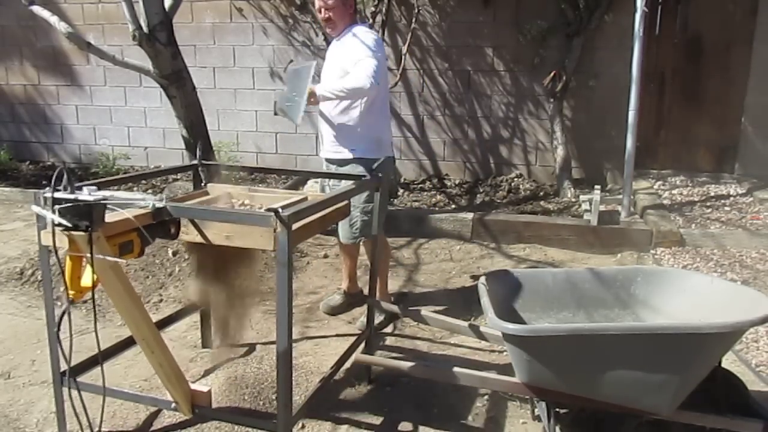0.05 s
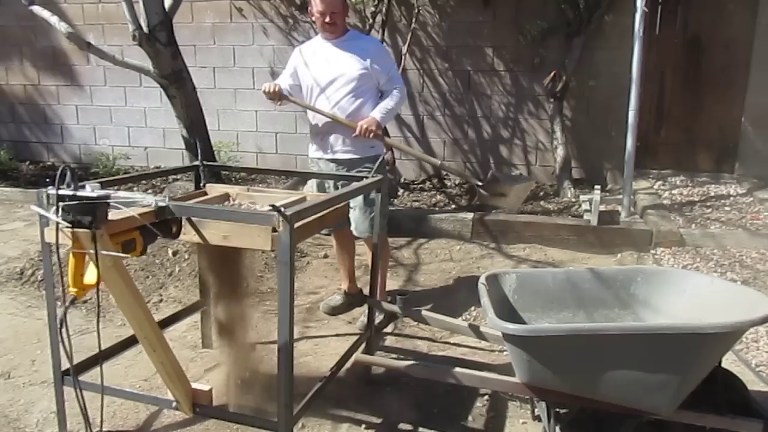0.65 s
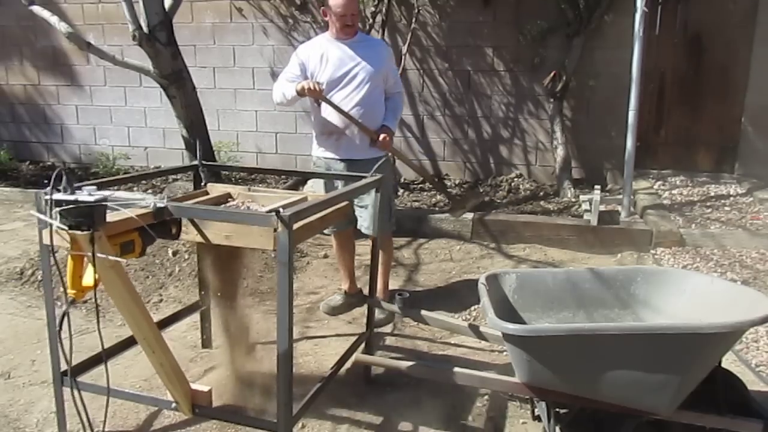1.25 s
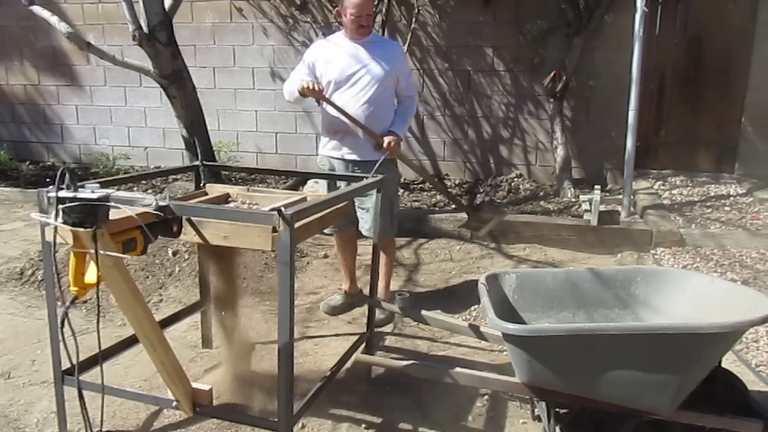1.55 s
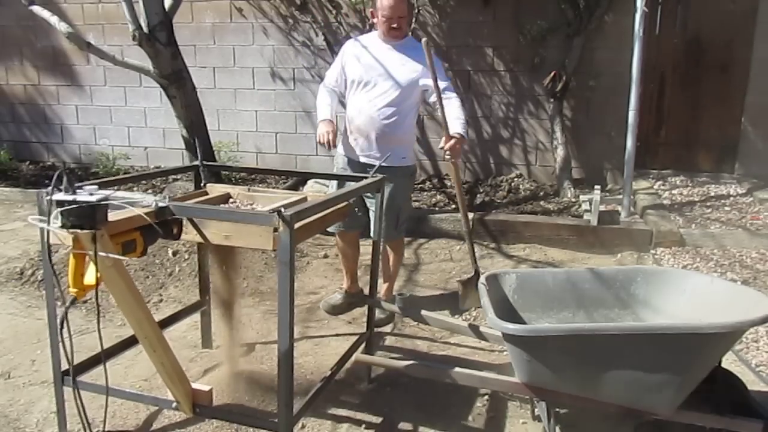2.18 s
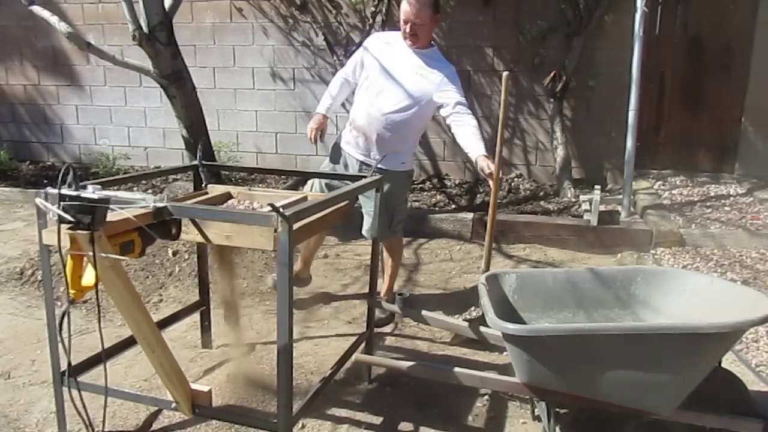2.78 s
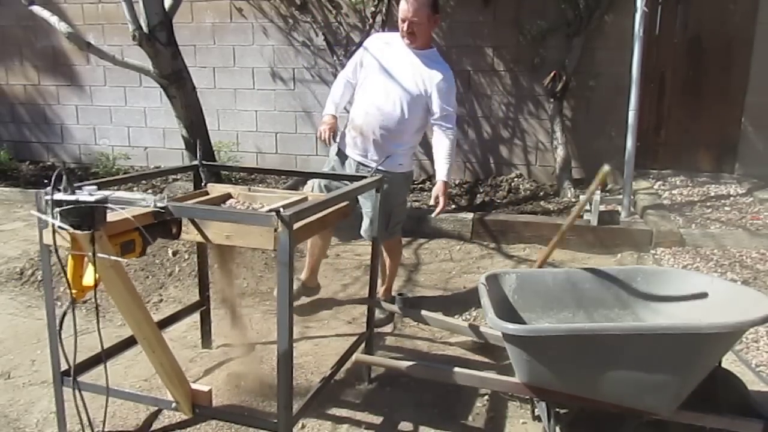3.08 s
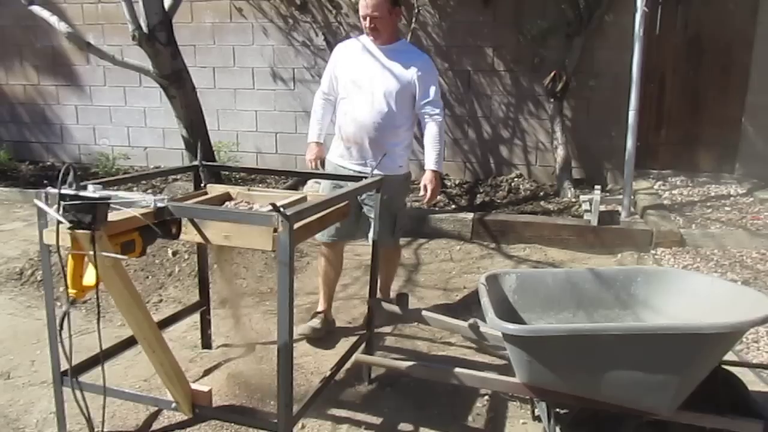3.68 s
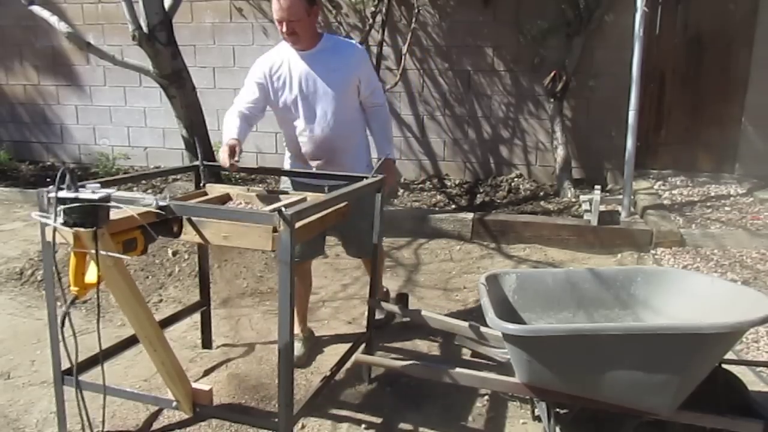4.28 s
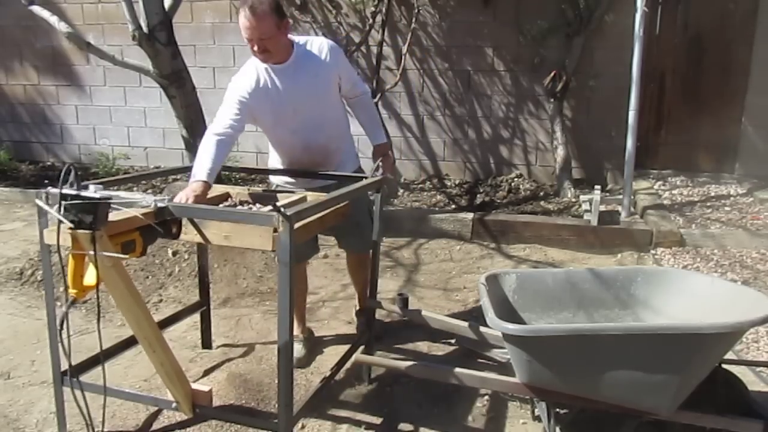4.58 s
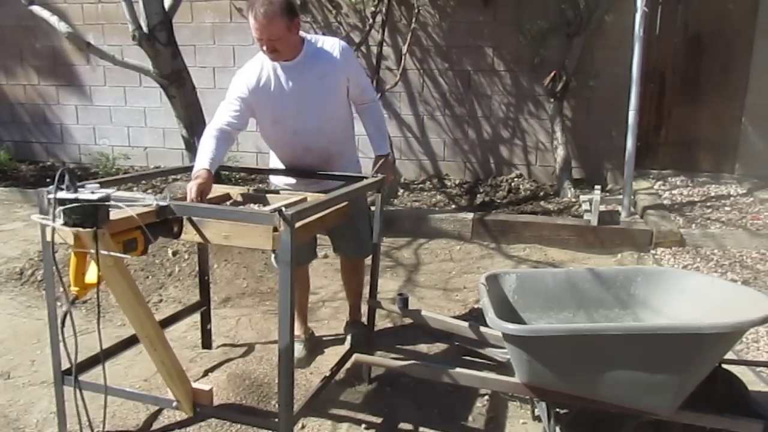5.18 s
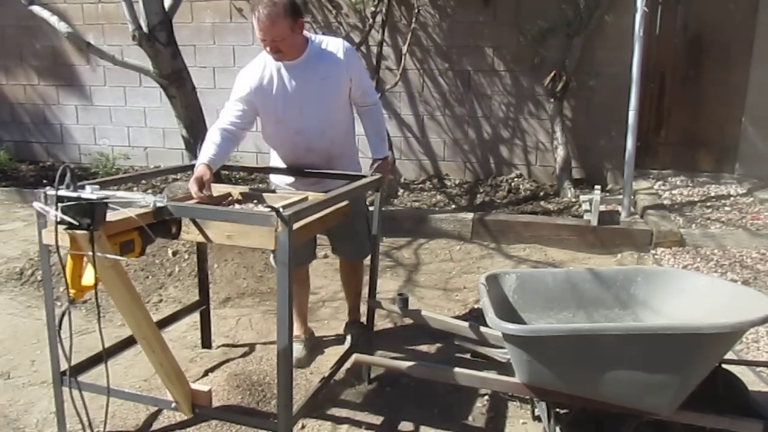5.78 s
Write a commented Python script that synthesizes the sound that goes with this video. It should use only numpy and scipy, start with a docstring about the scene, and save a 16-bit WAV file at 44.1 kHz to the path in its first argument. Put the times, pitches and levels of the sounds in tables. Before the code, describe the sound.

A reciprocating saw shakes a wooden sieve in a steel frame with a fast, even rattle. The tray knocks, its runners squeak, stones tumble and clink, and soil hisses through wire mesh. Near the middle, a shovel stabs gritty ground, then topples onto a plastic wheelbarrow with a loud crack and hollow boom. The rattling dips in volume and creeps back. It is heard in a backyard with little echo.

```python
"""Saw-driven soil sieve in a backyard.

A reciprocating saw shakes a wooden tray in a steel frame, about 7.6 strokes a second. Each stroke
knocks the tray, makes the runners chatter and throws stones and soil across the wire mesh.
A shovel stabs the ground, then topples onto a plastic wheelbarrow; the automatic gain ducks
and creeps back. A wall and a fence scatter a little sound."""
import sys
import numpy as np
from scipy import signal
from scipy.fft import rfft, irfft, next_fast_len
from scipy.io import wavfile
from scipy.ndimage import uniform_filter1d

SR = 44100
rng = np.random.default_rng(int(sys.argv[2]) if len(sys.argv) > 2 else 0)


def unload_audio(sound):
    """Save the sound as a 16-bit wav file, at the path given as the first command line argument."""
    columns = np.transpose(np.atleast_2d(sound))
    # keep every value between -1 and 1, then stretch to whole-number steps
    steps = np.round(np.clip(columns, -1, 1) * 32767)
    wavfile.write(sys.argv[1], SR, steps.astype(np.int16))


N = 257984
TIME = np.arange(N) / SR


def undb(db):
    """Decibels to gain."""
    return 10 ** (np.asarray(db) / 20)


def level(x, db):
    """Scale to an rms level."""
    return x * undb(db) / np.sqrt(np.mean(x ** 2))


def butter(x, order, hz, kind="low"):
    """Causal Butterworth filter."""
    return signal.sosfilt(signal.butter(order, hz, kind, fs=SR, output="sos"), x)


def colour(x, spectrum):
    """Filter by (frequency [Hz], gain [dB]) points."""
    hz, db = np.transpose(spectrum)
    size = next_fast_len(N + 4096)
    bins_hz = np.maximum(np.fft.rfftfreq(size, 1 / SR), 1)
    gain = undb(np.interp(np.log(bins_hz), np.log(hz), db))
    return irfft(rfft(x, size) * gain, size)[:N]


def impulses(times_s, sizes):
    """Impulse train of given times and sizes."""
    at = np.round(np.ravel(times_s) * SR).astype(int)
    inside = (at >= 0) & (at < N)
    return np.bincount(at[inside], np.ravel(sizes)[inside], N)


def decay(x, tau_s):
    """Give each impulse an exponential tail."""
    return signal.lfilter([1], [1, -np.exp(-1 / (tau_s * SR))], x)


def grains(rate_hz, spread_db):
    """Random collisions of unit rms; spread_db scales their size scatter."""
    size = undb(spread_db * np.minimum(rng.exponential(size=N), 3))
    return level((rng.random(N) < rate_hz / SR) * size * rng.choice([-1, 1], N), db=0)


def ring(x, modes):
    """Drive damped modes of alternating sign; little radiates below the lowest."""
    t = TIME[:SR // 2]
    body = sum((-1) ** k * undb(db) * np.sin(2 * np.pi * hz * t) * np.exp(-np.log(1000) * t / t60_s)
               for k, (hz, db, t60_s) in enumerate(modes))
    return signal.fftconvolve(x, butter(body, 2, 0.5 * modes[0][0], "high"))[:N]


def diffuse(x, t60_s):
    """Convolve with a decaying noise tail of unit energy."""
    t = TIME[:SR // 2]
    tail = rng.standard_normal(len(t)) * np.exp(-np.log(1000) * t / t60_s)
    return signal.fftconvolve(x, tail / np.sqrt(np.sum(tail ** 2)))[:N]


def latest(starts_s):
    """Per sample, index of the latest start; 0 before the first."""
    return np.maximum(np.searchsorted(starts_s, TIME) - 1, 0)


# Side reflections: (frequency [Hz], gain [dB])
SIDE_SPECTRUM = [(60, -19), (130, -8), (350, -16), (1400, -26), (2800, -15.5), (5500, -37), (13000, -5)]

def yard(x):
    """Block wall and fence scatter sound from ahead and from the sides; stereo."""
    delayed = np.pad(x, (SR // 80, 0))
    mid = x + undb(-16) * diffuse(delayed, t60_s=0.29)
    side = colour(diffuse(delayed, t60_s=0.12), SIDE_SPECTRUM)
    return np.array([mid + side, mid - side])


def soil_fall(peak_s=1.0, spread_s=0.35, band_hz=(52, 80)):
    """The bulk of the soil drops through the mesh and thuds softly on the ground."""
    thuds = butter(grains(rate_hz=300, spread_db=2), 2, band_hz, "band")
    return level(thuds, db=-53) * np.exp(-0.5 * ((TIME - peak_s) / spread_s) ** 2)


# Drumming of the loaded tray: (frequency [Hz], gain [dB])
RUMBLE_SPECTRUM = [(40, -20), (75, -4), (90, -4.5), (130, -2), (160, 0), (260, -1), (400, 4.5), (900, -37)]

def tray_rumble(shake_db):
    """The loaded tray drums low, louder as the frame shakes harder."""
    drumming = colour(grains(rate_hz=1500, spread_db=2.5), RUMBLE_SPECTRUM)
    return level(drumming * undb(1.8 * shake_db), db=-43)


# Drive jolts per stroke: (delay [s], frequency [Hz], level [dB], t60 [s])
CRANK_JOLTS = [(0.013, 105, -41, 0.14), (0.037, 363, -24, 0.022), (.057, 455, -24, 0.059),
               (0.061, 123.4, -37.5, 0.14), (.03, 75.5, -47, 0.22), (0.106, 260, -33.5, 0.1)]

def saw(strokes_s, shake_db, jitter_s=0.00071, uneven_db=2.5):
    """The crank jolts the frame at set points of each stroke; the frame sways at 4x the stroke rate."""
    jolts = 0
    for delay_s, hz, db, t60_s in CRANK_JOLTS:
        timing, force = rng.standard_normal((len(strokes_s), 2)).T
        blows = impulses(strokes_s + delay_s + jitter_s * timing, undb(uneven_db * force))
        jolts = jolts + ring(blows, [(hz, db, t60_s)])
    turns = np.interp(TIME, strokes_s, np.arange(len(strokes_s)))
    sway = np.sin(2 * np.pi * 4 * turns)
    return (jolts + level(sway, db=-63.5)) * undb(shake_db)


# Grit on wire mesh: (frequency [Hz], gain [dB])
SOIL_SPECTRUM = [(1500, -27), (4100, -6.5), (4900, -1), (6100, 0), (9000, -7), (11500, -19), (13500, -23),
                 (15500, -48)]

def soil_hiss(activity_db):
    """Grit slides over and rains through the whole mesh: a wide stereo hiss."""
    grit = (grains(rate_hz=8000, spread_db=2) * undb(activity_db) for _ in range(2))
    mid, side = (level(colour(x, SOIL_SPECTRUM), db=-34.5) for x in grit)
    side = colour(side, [(4000, -13.5), (9000, -8), (13000, -5)])
    return np.array([mid + side, mid - side])


# Blade in grit: (frequency [Hz], gain [dB])
BLADE_SPECTRUM = [(2000, -9), (4000, -5), (4900, -2), (7400, 1.5), (10000, -8.5), (13900, -23),
                  (15500, -39)]

def shovel_stab(start_s=2.468, rise_s=0.0038, length_s=0.026, fade_s=0.014):
    """The steel blade shears into gritty ground."""
    age_s = TIME - start_s
    push = np.clip(age_s / rise_s, 0, 1) * np.exp(-np.maximum(age_s - length_s, 0) / fade_s)
    return push * level(colour(grains(rate_hz=2600, spread_db=2), BLADE_SPECTRUM), db=-24)


# Handle landing and bouncing: (time [s], tub level [dB], rim level [dB])
HANDLE_HITS = [(3.154, -16, -6), (3.1565, -18, -13), (3.1590, -0.5, -5), (3.3446, -9, -34),
               (3.3513, -19.5, -27), (3.4030, -17, -18)]
# Wheelbarrow tub: (frequency [Hz], gain [dB], t60 [s])
TUB_MODES = [(130, -27, 0.11), (239, -16.5, 0.15), (303.6, -5, 0.035), (406, 1.5, 0.045),
             (515, -8.5, 0.086), (752, -8.5, 0.053)]
# Handle on rim: (frequency [Hz], gain [dB], t60 [s])
RIM_MODES = [(633, 0, 0.015), (935, -1.5, 0.022), (1350, -3.5, 0.013), (1750, -3, 0.017), (1790, -14, .025),
             (2380, -10, 0.011), (3380, -9, 0.012), (5000, -16, 0.0085)]

def shovel_fall():
    """The wooden handle cracks on the rim; the plastic tub booms, then shudders."""
    hits_s, tub_db, rim_db = np.transpose(HANDLE_HITS)
    boom = ring(impulses(hits_s, undb(tub_db)), TUB_MODES)
    crack = ring(impulses(hits_s, undb(rim_db)), RIM_MODES)
    shudder = diffuse(np.pad(boom + crack, (SR // 60, 0)), t60_s=0.33)
    return boom + crack + level(shudder, db=-41.5)


# Large stones on the frame: (time [s], level [dB])
STONE_HITS = [(1.12, -15.5), (1.374, -20), (1.659, -22), (2.556, -19), (2.833, -18), (2.956, -19),
              (5.033, -16)]
# Steel frame: (frequency [Hz], gain [dB], t60 [s])
FRAME_MODES = [(1175, -0.5, 0.041), (1268, 0.5, 0.038), (1385, 1, 0.038), (1774, -4.5, 0.052),
               (2099, -3.5, 0.089)]

def stone_clinks(contact_hz=1500):
    """Large stones strike the frame; their long contact favours its lower modes."""
    hits_s, db = np.transpose(STONE_HITS)
    blows = impulses(hits_s, undb(db))
    clatter = decay(blows, tau_s=0.01) * grains(rate_hz=1500, spread_db=6.5)
    return ring(butter(undb(-7) * blows + undb(-23) * clatter, 4, contact_hz), FRAME_MODES)


# Stones on the tray: (frequency [Hz], gain [dB])
STONE_SPECTRUM = [(30, -30), (50, -25), (110, -13), (160, -15.5), (280, -13.5), (410, -4), (520, -7.5),
                  (900, -1.5), (1070, -7.5), (1300, -5), (1520, -6), (1850, -1.5), (2100, -4), (2240, -6),
                  (2520, -2.5), (3250, -10.5), (3900, -21), (7000, -49)]

def stone_tumble(activity_db):
    """Stones tumble on the tray and set the loose frame ringing."""
    tumble = colour(grains(rate_hz=5200, spread_db=2) * undb(activity_db), STONE_SPECTRUM)
    jangle = ring(grains(rate_hz=150, spread_db=2.5) * undb(activity_db), FRAME_MODES)
    return level(tumble, db=-24.5) + level(jangle, db=-33)


# Activity within a stroke: (delay [s], stone level [dB], soil level [dB])
THROW_CYCLE = [(0, 4, 3.5), (.015, 2.5, 1.5), (.028, 0, -1), (.05, 0.5, -1.5), (.072, 3.5, 5), (.095, 3, 1),
               (.108, 3.5, 2.5), (.122, 5.5, 6.5)]

def load_throw(strokes_s, throw_s=0.096, uneven_db=0.8):
    """Stone and soil activity [dB] as each stroke throws the load; the amount of soil varies."""
    age_s = TIME - strokes_s[latest(strokes_s)]
    delay_s, *curves_db = np.transpose(THROW_CYCLE)
    period_s = np.mean(np.diff(strokes_s))
    stone_db, soil_db = (np.interp(age_s, delay_s, db, period=period_s) for db in curves_db)
    amount_db = uneven_db * rng.standard_normal(len(strokes_s))
    return stone_db, soil_db + np.interp(TIME, strokes_s + throw_s, amount_db)


# Steel runners: (frequency [Hz], gain [dB], t60 [s])
RUNNER_MODES = [(2499, 2, 0.039), (2660, 0, 0.017), (2788, -4.5, 0.028), (2955, -6.5, 0.014),
                (3290, -11, 0.0089)]

def runners(strokes_s, chatter_db, uneven_db=0.2, delay_s=0.032, length_s=0.023, fade_s=0.018):
    """On the return the tray scrapes loose, then squeaks along its runners in quick, uneven slips."""
    squeak = ring(grains(rate_hz=1100, spread_db=-0.5), RUNNER_MODES)
    power = np.abs(uniform_filter1d(squeak ** 2, SR // 90))
    squeak = squeak / np.sqrt(power + 1e-9)  # friction limits the swing
    slip_db = np.interp(strokes_s, TIME, chatter_db) + uneven_db * rng.standard_normal(len(strokes_s))
    slips_s = strokes_s + delay_s
    slip = latest(slips_s)
    age_s = TIME - slips_s[slip]
    attack = np.interp(age_s, [0, 0.001, length_s / 2], [0, undb(-2), 1])
    release = np.exp(-np.maximum(age_s - length_s, 0) / fade_s)
    friction = colour(grains(rate_hz=3500, spread_db=2),
                      [(900, -29), (1700, 8.5), (2600, -6), (3300, 4), (3900, -8.5), (7000, -50)])
    scrape = level(friction, db=-28) * decay(impulses(slips_s, undb(slip_db)), tau_s=0.0082)
    return squeak * attack * release * undb(slip_db[slip] - 26) + scrape


# Saw speed: (time [s], stroke rate [Hz])
STROKE_RATE = [(0, 7.595), (1.6, 7.6), (3.6, 7.65), (4.1, 7.77), (5.0, 7.74), (5.85, 7.64)]

def stroke_times(first_s=-0.0044):
    """Stroke starts [s], one per crank turn."""
    turns = np.cumsum(np.interp(TIME, *np.transpose(STROKE_RATE))) / SR
    return first_s + np.interp(np.arange(np.ceil(turns[-1])), turns, TIME)


# Tray swing into its stop: (time [s], hard knock level [dB])
TRAY_SWING = [(0.3, -20.5), (1.1, -19), (1.55, -17.5), (2.1, -17.5), (2.4, -14), (3.1, -15), (3.7, -24.5),
              (4.3, -18.5), (5.5, -17)]
# Skipped beats, where hard and soft knocks swap: (time [s])
SKIPS_S = [1.25, 4.0, 4.63, 5.54]

def knock_pattern(strokes_s, softer_db=6.5, lead_s=0.007496, reference_db=-17, lead_s_per_db=0.001):
    """Knock times [s] and levels [dB]: just before each stroke, hard and soft in turn, softer earlier."""
    soft = (np.arange(len(strokes_s)) + np.searchsorted(SKIPS_S, strokes_s)) % 2 == 0
    db = np.interp(strokes_s, *np.transpose(TRAY_SWING)) - softer_db * soft
    return strokes_s - lead_s - lead_s_per_db * (reference_db - db), db


# Wooden tray: (frequency [Hz], gain [dB], t60 [s])
TRAY_MODES = [(520, -9.5, 0.043), (627, -3, 0.044), (701, -7.5, 0.063), (776, -2.5, 0.039),
              (918, -5.5, 0.046), (1370, -13, 0.011), (1800, -13, 0.023)]

def tray_knocks(knocks_s, db, rebound_s=0.0095, settle_s=0.025, settle_db=-8, soft_hz=800):
    """The tray hits its stop, rebounds and settles with duller blows; stones jump and patter back."""
    timing, force_db = rng.standard_normal((len(knocks_s), 2, 2)).swapaxes(0, 1)
    hits = impulses(knocks_s, undb(db))
    bounces_s = knocks_s[:, None] + np.array([rebound_s, settle_s]) * (1 + 0.116 * timing)
    bounces_db = db[:, None] + np.array([0, settle_db]) + force_db
    bounces = impulses(bounces_s, undb(bounces_db))
    blows = hits + butter(bounces, 2, soft_hz)
    patter = decay(hits + bounces, tau_s=0.0057) * grains(rate_hz=4000, spread_db=3)
    wood = ring(undb(1.04) * blows + undb(-26) * patter, TRAY_MODES)
    return wood + undb(4.5) * colour(patter, STONE_SPECTRUM)


# Slow drift of the sieve: (time [s], tray load [dB], frame shake [dB], runner chatter [dB])
SIEVE_DRIFT = [(0, 0, -2, 2), (0.898, 2, 0, 3.5), (1.6, 1, 0, 1.5), (2.4, 1, -0.5, 1), (3.1, 0, -0.5, 0),
               (3.801, -1, -1.5, 0.5), (4.6, -0.76, 0.5, 0), (5.3, 0.5, 0.5, -1), (5.85, 2.5, 4, 1.5)]

def scene(left_bias_db=1.0):
    """Sieve and shovel in the yard, slightly left of centre."""
    strokes_s = stroke_times()
    times_s, *curves_db = np.transpose(SIEVE_DRIFT)
    load_db, shake_db, chatter_db = (np.interp(TIME, times_s, db) for db in curves_db)
    stone_db, soil_db = load_throw(strokes_s)
    sieve = (stone_tumble(stone_db + load_db) + tray_knocks(*knock_pattern(strokes_s))
             + runners(strokes_s, chatter_db) + saw(strokes_s, shake_db)
             + tray_rumble(shake_db) + stone_clinks())
    stereo = yard(sieve + soil_fall() + shovel_stab() + shovel_fall()) + soil_hiss(soil_db + load_db)
    return stereo * undb([[left_bias_db / 2], [-left_bias_db / 2]])


def gain_control(x, ceiling_db=-11, recovery_db_per_s=4.0, attack_s=0.00075):
    """A burst over the ceiling ducks the gain fast; it recovers slowly."""
    power = uniform_filter1d(np.mean(x ** 2, axis=0), SR // 125)
    over_db = np.maximum(10 * np.log10(np.abs(power) + 1e-12) - ceiling_db, 0)
    ramp_db = recovery_db_per_s * TIME
    duck_db = np.maximum.accumulate(over_db + ramp_db) - ramp_db
    pole = np.exp(-1 / (attack_s * SR))
    return x * undb(-signal.lfilter([1 - pole], [1, -pole], duck_db))


def record(dry, low_hz=24, top_hz=15400):
    """Bass cut, automatic gain, steep treble cut."""
    ducked = gain_control(butter(dry, 2, low_hz, "high"))
    return signal.sosfilt(signal.ellip(10, 0.2, 80, top_hz, fs=SR, output="sos"), ducked)


dry = scene()
out = record(dry)
unload_audio(out)
```